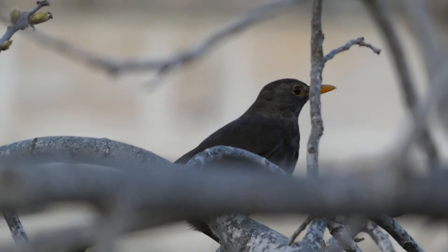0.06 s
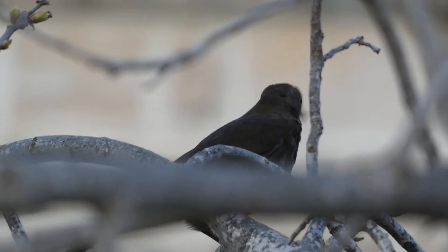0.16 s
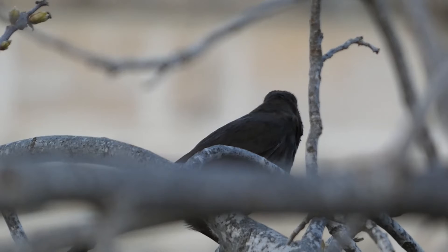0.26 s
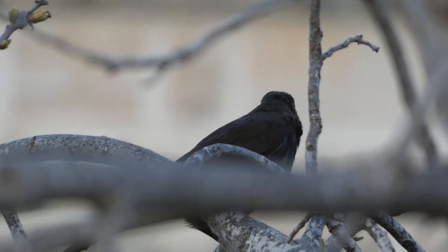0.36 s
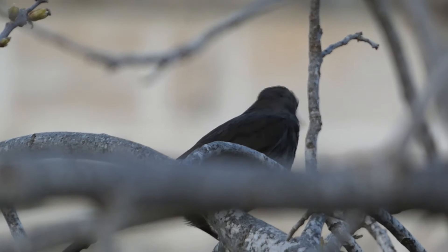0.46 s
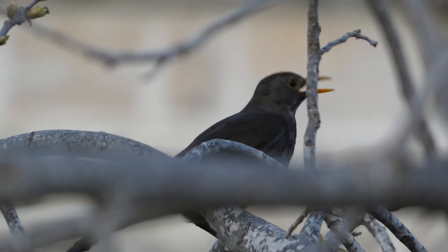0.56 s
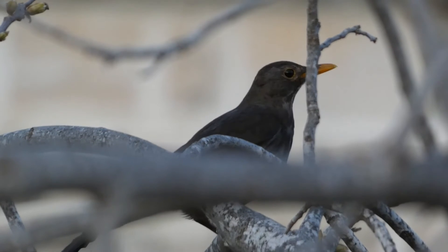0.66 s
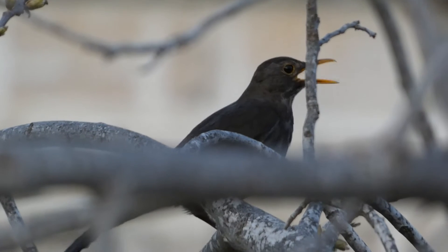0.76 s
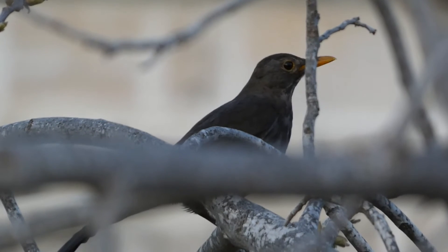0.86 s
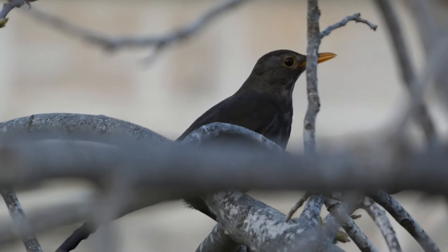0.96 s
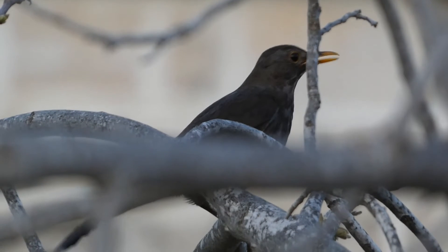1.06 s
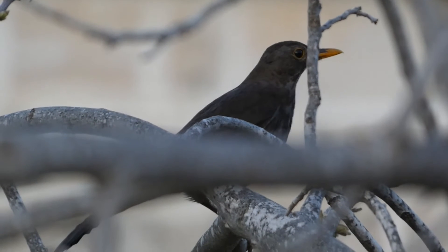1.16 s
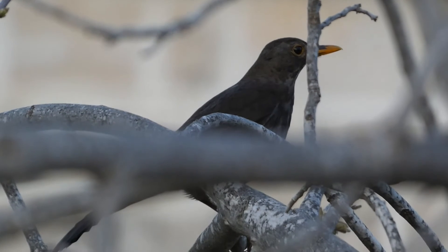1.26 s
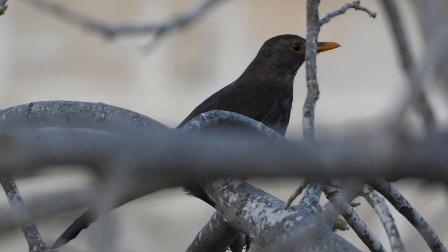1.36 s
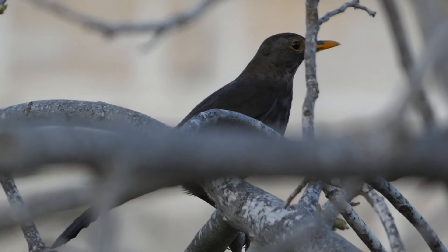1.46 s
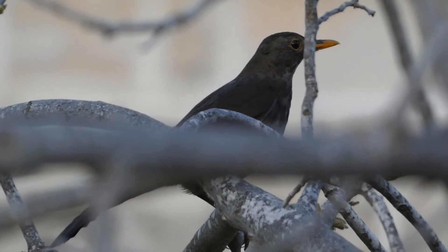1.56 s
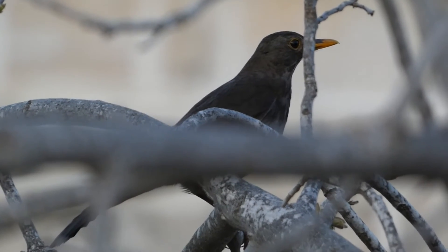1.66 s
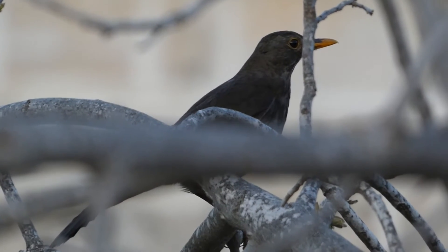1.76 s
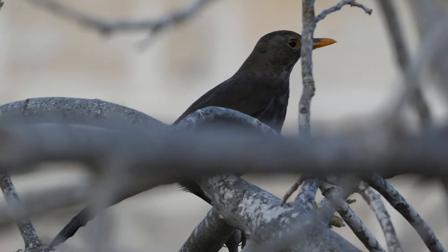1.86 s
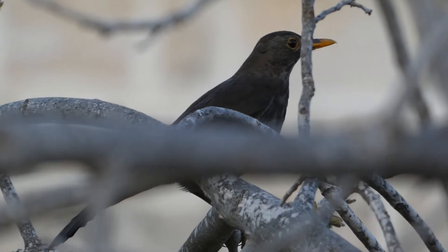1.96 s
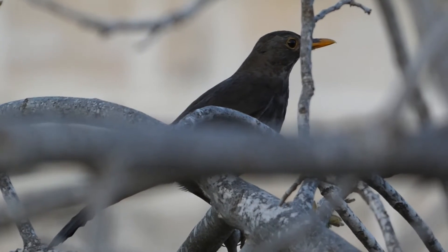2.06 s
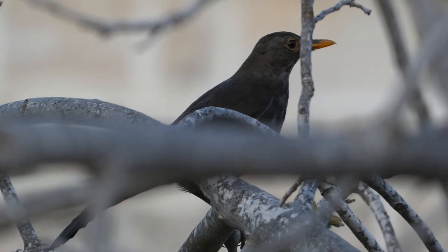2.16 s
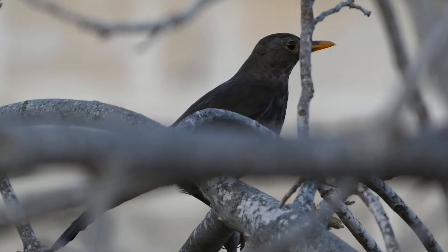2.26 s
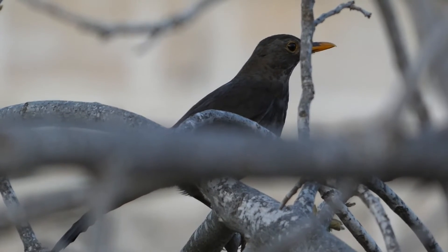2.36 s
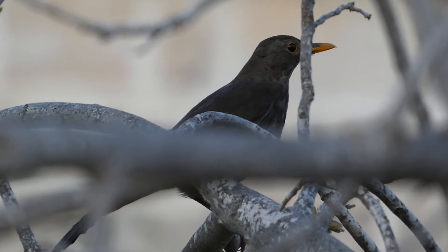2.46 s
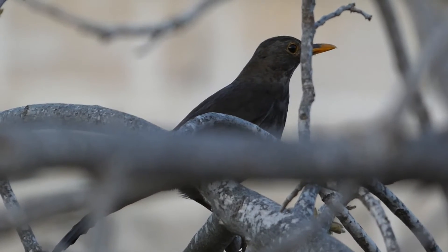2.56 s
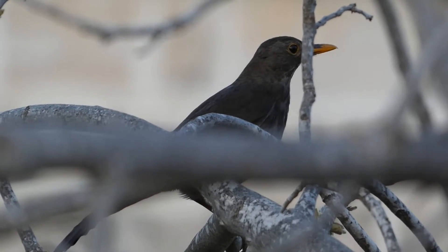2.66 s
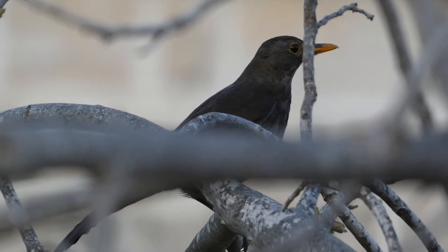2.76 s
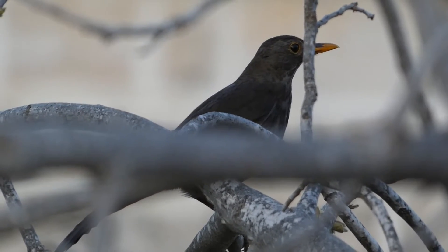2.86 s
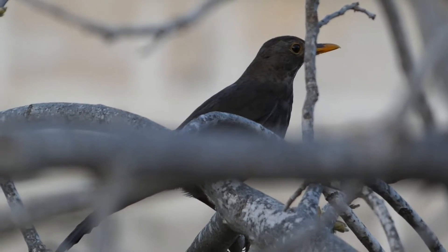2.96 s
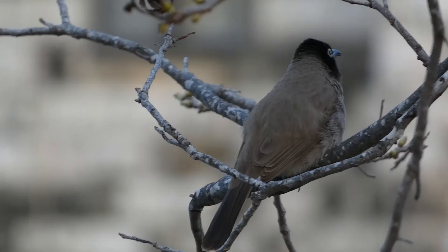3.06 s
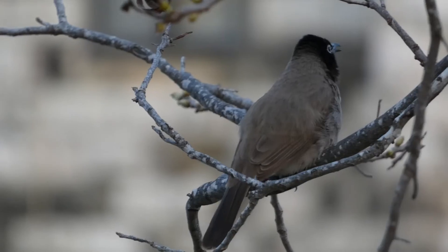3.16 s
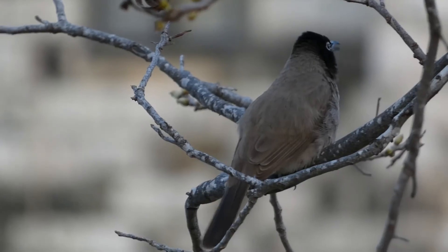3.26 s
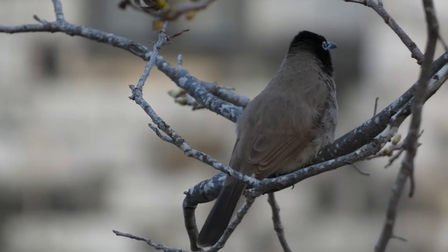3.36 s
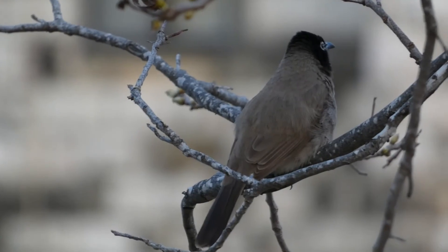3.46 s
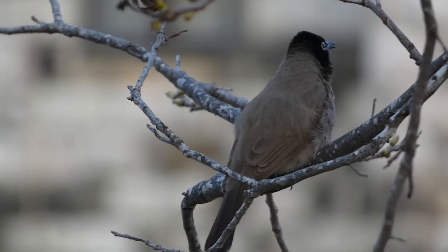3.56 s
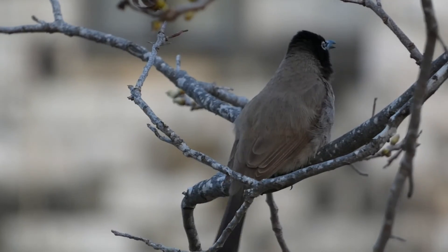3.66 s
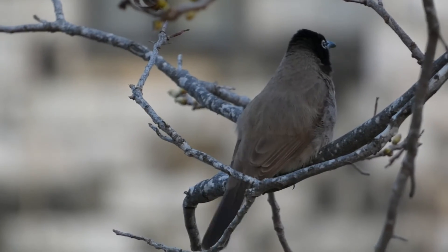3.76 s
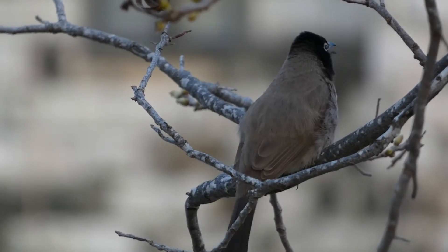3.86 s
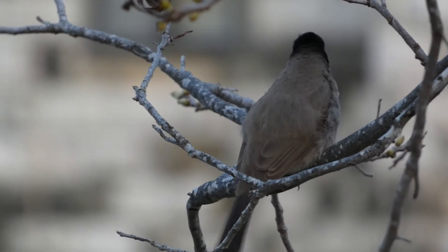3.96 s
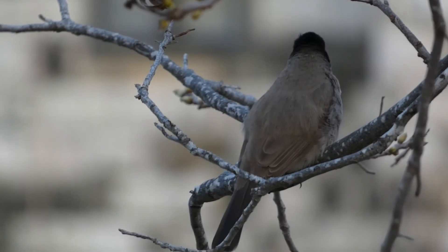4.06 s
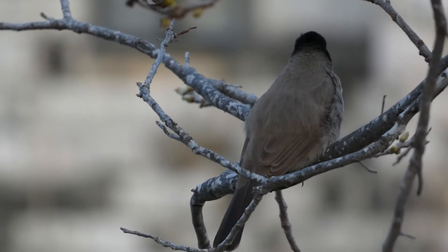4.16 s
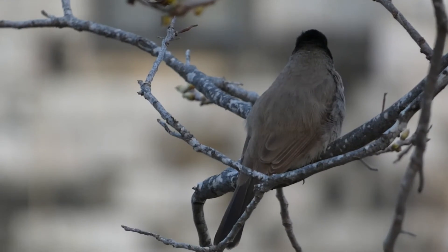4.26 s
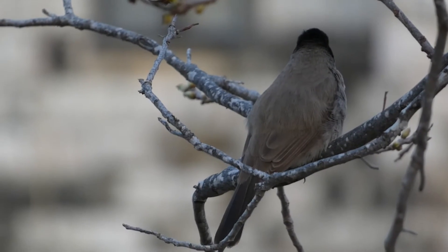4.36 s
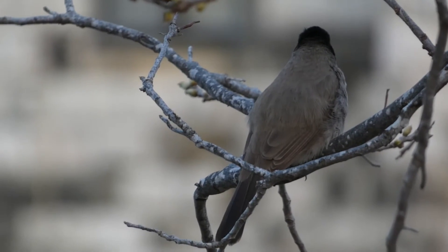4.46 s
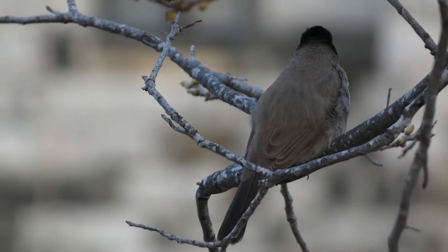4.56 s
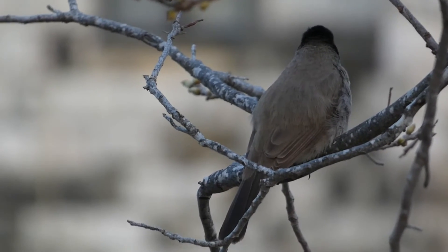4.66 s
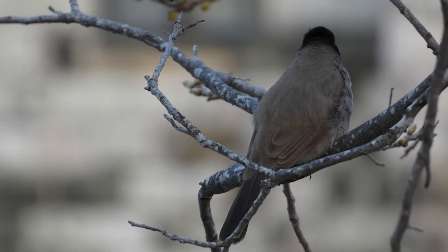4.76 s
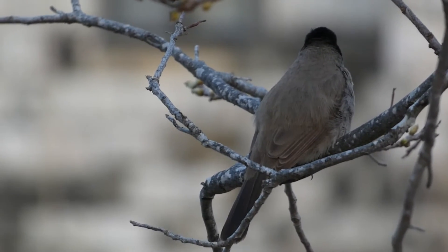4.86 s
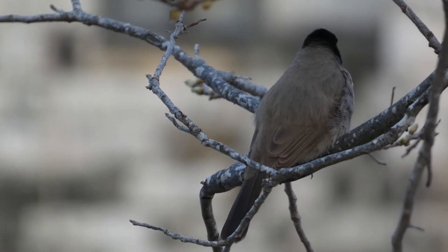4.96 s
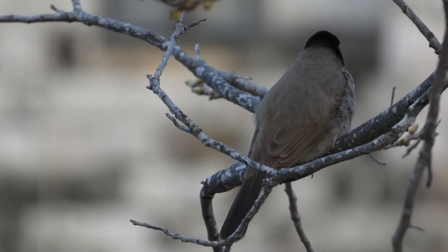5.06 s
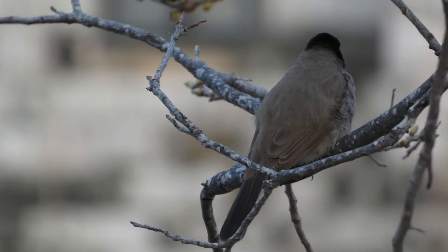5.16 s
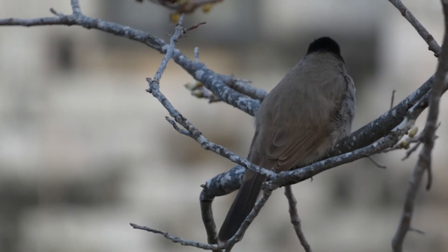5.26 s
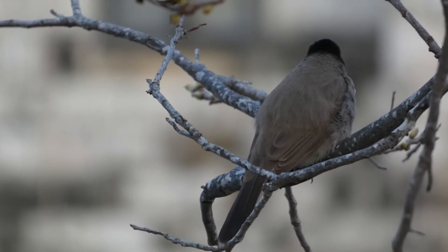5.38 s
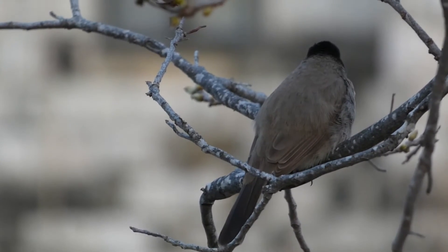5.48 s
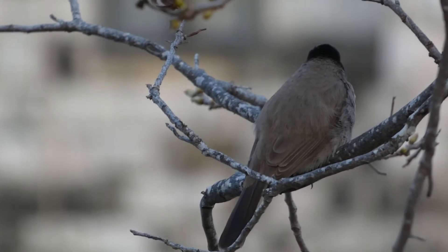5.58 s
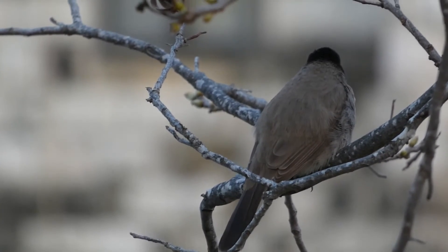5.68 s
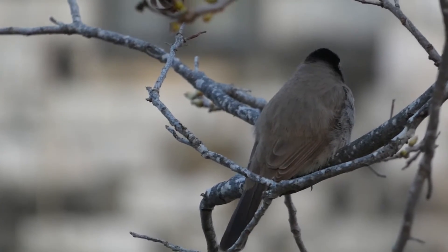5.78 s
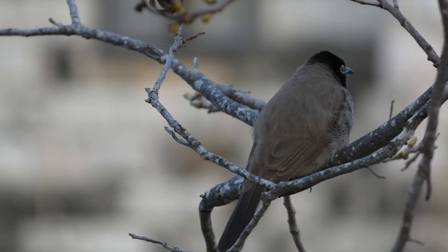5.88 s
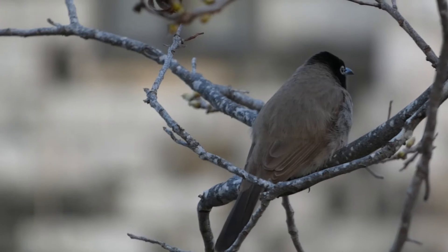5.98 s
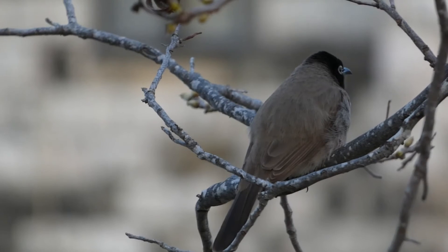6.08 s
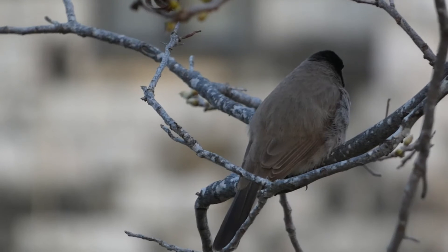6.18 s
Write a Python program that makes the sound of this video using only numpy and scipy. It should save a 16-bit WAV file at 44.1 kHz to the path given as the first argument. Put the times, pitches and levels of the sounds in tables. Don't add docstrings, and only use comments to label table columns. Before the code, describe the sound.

An outdoor stereo scene in quiet town yards, with soft low rumble, light hiss and faint, dense bird chatter, busiest at the start. A faint chirp at 0.57 s leads into three very short, bright metallic chinks from a blackbird at about 0.65, 0.84 and 1.1 s, the first softer, all with wall echoes. Small pips and distant whistles follow, then two clear hooked chirps from neighbours at 1.9 and 2.15 s. It thins until the scene changes at 3.13 s. A buzzy falling chirp and a nearer, rounded, flute-like warble come at 3.15-3.37 s with grainy clicks, a lower, softer warble at 3.6-3.8 s, and a brighter rising one at 3.9-4.05 s. Afterwards come smeared chirps near 4.15, 5.15 and 5.93 s, faint whistles, wavering low hums and a slight traffic swell around 4.5 s. Quick twittering pips from 5.5 s and a faint high trill from 5.66 s run to the end, about 6.2 s.

```python
import sys
import numpy as np
from scipy import signal
from scipy.fft import rfft, irfft, next_fast_len
from scipy.io import wavfile
from scipy.ndimage import uniform_filter1d

SR = 44100
rng = np.random.default_rng(int(sys.argv[2]) if len(sys.argv) > 2 else 0)


def waveform_to_disk(signal):
    frames = np.transpose(np.atleast_2d(signal))
    scaled = np.clip(frames, -1, 1) * 32767
    samples = np.round(scaled).astype(np.int16)
    wavfile.write(sys.argv[1], SR, samples)


def voltage_ratio(level):
    return 10 ** (np.asarray(level, float) / 20)


N = 274302
CUT_S = 3.13

# t60 in seconds, level in dB.
TAILS = [
    (.8, -23),
    (.9, -22),
    (.45, -15),
]


def along(table, hz):
    at, value = np.transpose(table)
    return np.interp(np.log(hz), np.log(at), value)


def wander(rate_hz):
    step = int(SR / rate_hz)
    x = np.repeat(rng.standard_normal(N // step + 1), step)
    x = uniform_filter1d(uniform_filter1d(x, step), step)[:N]
    return x / x.std()


def band(x, hz, width_hz):
    edges = np.clip([hz - width_hz / 2, hz + width_hz / 2], 20, SR / 2.2)
    y = signal.sosfilt(signal.butter(4, edges, "band", fs=SR, output="sos"), x)
    return y / y.std()


def lowpass(x, order, hz):
    return signal.sosfilt(signal.butter(order, hz, fs=SR, output="sos"), x)


def trace(note, fade_s):
    s, pitch_hz, db = np.transpose(sorted(note))
    at = np.arange(int((s[0] - fade_s) * SR), min(int((s[-1] + fade_s) * SR), N))
    t = at / SR
    fade = np.clip(np.minimum(t - t[0], t[-1] - t) / fade_s, 0, 1)
    size = np.sqrt(2) * np.interp(t, s, voltage_ratio(db)) * fade ** 2
    return at, size, uniform_filter1d(np.interp(t, s, pitch_hz), 60)


def voice(notes, fade_s, jitter, flutter_db):
    size, hz = np.zeros(N), np.zeros(N)
    for note in notes:
        at, size_here, hz_here = trace(note, fade_s)
        size[at], hz[at] = size_here, hz_here
    phase = 2 * np.pi * np.cumsum(hz * (1 + jitter * wander(300))) / SR
    return size * voltage_ratio(flutter_db * wander(200)), phase


def whistles(notes, bearings, fade_s, jitter, flutter_db):
    out = np.zeros((2, N))
    wobble, flutter = 1 + jitter * wander(300), voltage_ratio(flutter_db * wander(120))
    for note, (pan_db, lead_rad) in zip(notes, bearings):
        at, size, hz = trace(note, fade_s)
        phase = 2 * np.pi * np.cumsum(hz * wobble[at]) / SR
        for channel, way in enumerate((.5, -.5)):
            out[channel, at] += size * flutter[at] * voltage_ratio(way * pan_db) * np.sin(phase + way * lead_rad)
    return out


def glides(rows, ends_db):
    notes = []
    for s, length_s, first_hz, last_hz, db in rows:
        middle = (s + length_s / 2, (first_hz + last_hz) / 2, db)
        notes.append([(s, first_hz, db + ends_db), middle, (s + length_s, last_hz, db + ends_db)])
    return notes


def repeats(contour, starts_s):
    return [[(start + s, hz, db) for s, hz, db in contour] for start in starts_s]


def scatter(t60_s, rise_s, likeness):
    t = np.arange(int(t60_s * SR)) / SR
    mid, side = rng.standard_normal((2, len(t)))
    shape = np.exp(-np.log(1000) * t / t60_s) * (1 - np.exp(-t / rise_s))
    c = np.clip(likeness, -1, 1)
    pair = shape * (np.sqrt(1 + c) * mid + np.sqrt(1 - c) * side * np.array([[1], [-1]]))
    return pair / np.sqrt(np.sum(pair ** 2) / 2)


def yard(x, echoes, tail):
    t60_s, tail_db = tail
    response = voltage_ratio(tail_db) * scatter(t60_s, rise_s=0.024, likeness=0.79)[0]
    for delay_s, db in echoes:
        facade = scatter(delay_s * .35, rise_s=delay_s / 30, likeness=1)[0]
        start = int(delay_s * SR)
        response[start:start + len(facade)] += voltage_ratio(db) * facade
    response = lowpass(response, 2, 7000)
    returns = signal.fftconvolve(x, response[None], axes=1)[:, :N]
    return x + voltage_ratio(2.55 * wander(45)) * returns


def distance(x, direct_db, t60_s, likeness):
    response = scatter(t60_s, rise_s=0.0043, likeness=likeness)
    response[:, 0] += voltage_ratio(direct_db)
    return signal.fftconvolve(x, response, axes=1)[:, :N]


def town():
    # frequency in Hz, level in dB per Hz.
    colours = [
        [(15, -54), (25, -22.5), (99, -0.5), (205, -1.5), (261, -3.5), (342, -8), (436, -9), (619, -9),
         (1680, -17), (2880, -20.5), (12000, -28), (15800, -27.5)],
        [(15, -61), (25, -39), (80, -1.5), (179, -1), (254, 0), (413, -3.5), (556, -8.5), (1770, -17.5),
         (3580, -16.5), (6300, -28), (15800, -29)],
    ]
    levels_db = [-57, -53.5]
    # frequency in Hz, correlation from -1 to 1.
    likenesses = [
        [(40, 0.14), (130, 0.48), (3100, -0.56), (6800, 0.33), (15000, -0.38)],
        [(40, 0.29), (300, 0.66), (1400, 0.06), (3100, -0.4), (6800, .2), (15000, -0.2)],
    ]
    # frequency in Hz, left minus right in dB.
    lean_db = [(300, -1.5), (3000, -1), (12000, 1.5)]
    # time in seconds, gain in dB.
    traffic = [
        (3.13, -2),
        (4.2, -1.5),
        (4.55, 0.5),
        (6.22, -1.5),
    ]
    size = next_fast_len(N)
    hz = np.maximum(np.arange(size // 2 + 1) * SR / size, 1)
    lean = along(lean_db, hz) / 2
    after = np.clip((np.arange(N) / SR - CUT_S) / 0.012, 0, 1)
    out = 0
    for colour, db, likeness, share in zip(colours, levels_db, likenesses, (1 - after, after)):
        c = np.clip(along(likeness, hz), -1, 1)
        mid, side = rfft(rng.standard_normal((2, size))) * voltage_ratio(along(colour, hz))
        pair = mid + np.sqrt((1 - c) / (0.95 + c)) * side * np.array([[1], [-1]])
        noise = irfft(pair * voltage_ratio([lean, -lean]), size)[:, :N] / irfft(mid, size).std()
        out = out + share * voltage_ratio(db) * noise
    swell_db = np.interp(np.arange(N) / SR, *np.transpose(traffic), left=0) + 0.45 * wander(1.27)
    return out + lowpass(out, 2, 600) * (voltage_ratio(swell_db) - 1)


def drone():
    # start in seconds, length in seconds, first pitch in Hz, last pitch in Hz, level in dB.
    bursts = [(1.3, 0.044, 260, 265, -54.5), (4.5, 0.157, 234.1, 245, -53), (4.68, 0.086, 250, 261, -47.5),
              (4.97, 0.078, 259.7, 260, -52.5), (5.3, 0.293, 246.4, 258, -54), (5.74, 0.11, 258, 255, -54),
              (5.9, 0.17, 280, 250, -63.5), (5.17, 0.11, 240, 210, -61.5), (5.62, .06, 262, 264, -58),
              (4.28, .05, 330, 321, -58.5), (4.52, 0.066, 390, 353, -56), (4.6, .2, 350, 340, -61.5),
              (4.55, .15, 460, 455, -59), (4.89, .1, 445, 420, -62), (4.7, 0.11, 365, 375, -59.5),
              (4.45, 0.087, 530, 450, -65), (0.838, 0.048, 520, 520, -59.5), (1.5, 0.078, 770, 770, -64),
              (1.5, .17, 780, 770, -66), (3.97, 0.073, 800, 790, -60.5)]
    bearings = [(0.0031, 0)] * len(bursts)
    tones = whistles(glides(bursts, ends_db=-2.0), bearings, fade_s=.03, jitter=0.033, flutter_db=2.5)
    return tones * voltage_ratio(2 * wander(25))


def chatter(count=900):
    # time in seconds, level in dB.
    course = [
        (0.0, -55.5),
        (0.95, -59.5),
        (2.87, -61.5),
        (4.17, -61.5),
        (5.2, -61),
        (6.22, -65),
    ]
    out = np.zeros(N + SR)
    for when, pitch, glide, length, size in rng.random((count, 5)):
        t = np.arange(int((0.01 + 0.044 * length) * SR)) / SR
        hz = 2800 * 2.1 ** pitch ** 1.5 * (1 + 9 * (glide - .6) * t)
        start = int(when * N)
        chirp = np.hanning(len(t)) * np.sin(2 * np.pi * np.cumsum(hz) / SR)
        out[start:start + len(t)] += voltage_ratio(-9 * size) * chirp
    s, db = np.transpose(course)
    crowd = out[:N] / out[:N].std() * voltage_ratio(np.interp(np.arange(N) / SR, s, db) - 2)
    return distance(crowd[None], direct_db=-7, t60_s=0.58, likeness=-0.31)


def trill():
    # pitch in Hz, level in dB, offset from the beat in seconds.
    blips = [
        (6000, -56.5, 0),
        (5950, -66.5, 0.0496),
    ]
    beats_s = np.arange(5.662, 6.2, .1)
    notes = []
    for hz, db, lag_s in blips:
        for s in beats_s + lag_s:
            notes.append([(s - .004, 1.01 * hz, db), (s, hz, db), (s + 0.0061, .975 * hz, db - 2)])
    return whistles(notes, [(2, -1.7)] * len(notes), fade_s=.004, jitter=.004, flutter_db=1)


def aside():
    # start in seconds, length in seconds, first pitch in Hz, last pitch in Hz, level in dB.
    falls = [
        (1.9, .12, 2580, 1556, -63),
        (4.5, .25, 3000, 1627, -65),
        (5.09, .21, 2700, 1260, -69),
        (4.3, .14, 2650, 2460, -62),
    ]
    # seconds after start, pitch in Hz, level in dB.
    arch = [
        (0, 1459, -69),
        (.03, 1618, -75),
        (0.061, 1520, -67),
        (.085, 1400, -67),
    ]
    arch_starts_s = [.805, 1.13, 1.455, 1.78, 2.13]
    # seconds after start, pitch in Hz, level in dB.
    swoop = [
        (0, 4450, -48),
        (.04, 3220, -72),
        (.12, 3380, -64),
        (.18, 4610, -53.5),
    ]
    swoop_starts_s = [.92, 1.36]
    notes = glides(falls, ends_db=-4) + repeats(arch, arch_starts_s) + repeats(swoop, swoop_starts_s)
    return whistles(notes, [(0, 2.82)] * len(notes), fade_s=.01, jitter=0.0071, flutter_db=4.5)


def far_birds():
    # start in seconds, length in seconds, first pitch in Hz, last pitch in Hz, level in dB.
    rows = [(.23, 0.049, 9250, 8970, -72), (.37, 0.081, 4510, 4200, -65), (.553, 0.013, 5300, 5120, -67),
            (.583, .012, 5600, 3900, -64), (.775, .02, 5240, 5650, -60), (1.655, .02, 5430, 6210, -61),
            (1.675, 0.014, 6200, 5700, -59.5), (1.75, .022, 4700, 5760, -58.5),
            (1.775, 0.033, 5730, 5870, -66), (3.52, 0.12, 6190, 6150, -73.5), (3.78, .16, 5000, 6240, -77),
            (3.79, 0.052, 4072, 4080, -59), (3.875, 0.18, 6180, 6153, -66.5), (4.18, .1, 6158, 6120, -63.5),
            (4.285, .02, 6090, 5300, -59.5), (4.39, 0.089, 4942, 4935, -62.5),
            (4.46, 0.25, 3223, 3110, -60), (4.72, 0.13, 3560, 3500, -66), (4.82, 0.16, 8020, 8050, -69.5),
            (5.06, 0.16, 7860, 7885, -66.5), (5.45, 0.11, 5660, 5560, -72),
            (4.88, 0.073, 5120, 4980, -67.5)]
    bearings = [(2, -1.58)] * len(rows)
    far = whistles(glides(rows, ends_db=-2.5), bearings, fade_s=0.0055, jitter=.003, flutter_db=3)
    far = far + trill() + aside()
    return voltage_ratio(3.0) * distance(far, direct_db=2.5, t60_s=0.66, likeness=0.82)


def hidden_birds():
    # start in seconds, length in seconds, first pitch in Hz, last pitch in Hz, level in dB.
    rows = [(3.85, 0.041, 3440, 4197, -60), (3.893, 0.026, 4250, 3460, -57),
            (4.085, .06, 3980, 3965, -56.5), (4.55, 0.11, 5125, 5740, -67.5),
            (4.68, 0.057, 5630, 4750, -62), (4.89, 0.037, 3940, 3600, -63), (5.08, .11, 3500, 4100, -66),
            (4.5, 0.055, 3820, 3890, -68), (4.62, .06, 3320, 3010, -63), (4.52, .18, 2800, 1950, -73.5)]
    # top in seconds, top pitch in Hz, level in dB.
    spikes = [
        (4.153, 5290, -53),
        (5.146, 5280, -58),
        (5.934, 5300, -53),
    ]
    # seconds from top, share of top pitch, level in dB.
    spike = [
        (-.006, .74, 2),
        (0, 0.97, -7.5),
        (.01, .77, 1.5),
        (.036, .58, -3),
    ]
    notes = glides(rows, ends_db=-2.5)
    for top_s, hz, db in spikes:
        notes.append([(top_s + s, hz * share, db + more_db) for s, share, more_db in spike])
    hidden = whistles(notes, [(0, -.5)] * len(notes), fade_s=.005, jitter=.01, flutter_db=3.5)
    echoes = [(.019, 0.2), (.034, 0.35), (.057, 0.3)]
    hidden = hidden + sum(share * np.roll(hidden, int(lag_s * SR), axis=1) for lag_s, share in echoes)
    return voltage_ratio(1.5) * distance(hidden, direct_db=2.5, t60_s=.45, likeness=.9)


def hooks(rows, run_s, run_db, sag_db, fall_s, fall_hz):
    dip_s, dip_db_per_khz = .01, 16
    notes = []
    for s, run_hz, dip_hz, spike_hz, db in rows:
        notes.append([
            (s - run_s, .92 * run_hz, db - 19),
            (s - 0.764 * run_s, run_hz, db + run_db - 5.5),
            (s - 0.485 * run_s, .99 * run_hz, db + run_db),
            (s - 1.9 * dip_s, .94 * run_hz, db + sag_db),
            (s - dip_s, dip_hz, db - dip_db_per_khz * (run_hz - dip_hz) / 1e3),
            (s, spike_hz, db),
            (s + 0.37 * fall_s, fall_hz + .55 * (spike_hz - fall_hz), db - 5.5),
            (s + fall_s, fall_hz, db - 18.0)])
    return notes


def buzz(count=9):
    # time in seconds, fundamental in Hz.
    fundamental = [
        (3.145, 1960),
        (3.165, 1527),
        (3.183, 1510),
        (3.198, 1010),
    ]
    # multiple, start in seconds, end in seconds, level in dB.
    overtones = [(2, 3.145, 3.178, -52), (3, 3.15, 3.175, -53.5), (3, 3.172, 3.194, -39.5),
                 (4, 3.157, 3.18, -50.5), (5, 3.15, 3.175, -50.5), (5, 3.188, 3.198, -39),
                 (6, 3.18, 3.196, -38)]
    share = np.linspace(0, 1, count)
    notes = []
    for multiple, start_s, end_s, db in overtones:
        t = start_s + share * (end_s - start_s)
        hz = np.round(multiple) * np.interp(t, *np.transpose(fundamental))
        notes.append(list(zip(t, hz, db - 30 * (share - .65) ** 2)))
    return notes


def neighbours():
    # spike in seconds, run pitch in Hz, dip pitch in Hz, spike pitch in Hz, level in dB.
    loud_hooks = [
        (1.908, 3538, 3015, 3690, -37),
        (2.146, 3800, 2500, 4130, -36),
    ]
    faint_hooks = [
        (.568, 3640, 2520, 4120, -47),
        (5.465, 3650, 3020, 4100, -55.5),
    ]
    # left minus right in dB, left phase lead in rad.
    hook_bearings = [
        (-3, 0.84),
        (-3, 0.82),
        (-10, -1.5),
        (-9, -.5),
    ]
    # start in seconds, length in seconds, first pitch in Hz, last pitch in Hz, level in dB.
    rows = [(1.912, .026, 6850, 4480, -60.5), (2.705, 0.04, 2780, 3350, -55),
            (2.745, 0.016, 3260, 2920, -56), (2.722, 0.041, 3900, 4000, -57.5),
            (2.89, 0.033, 3530, 3360, -63), (3.052, 0.11, 5200, 5750, -62), (3.205, .011, 4300, 5250, -53),
            (3.218, .006, 5130, 4200, -51), (3.225, 0.0083, 4150, 3860, -45),
            (3.24, 0.013, 6090, 6440, -44.5), (3.251, 0.014, 5780, 5750, -41.5),
            (3.925, 0.022, 2800, 3250, -42.5)]
    # left minus right in dB, left phase lead in rad.
    glide_bearings = [(0, -.2), (-4, -1.8), (-6, -2), (-11, -2), (-9, 2), (0.5, .8), (-1.5, -1), (1, -.5),
                      (0, 0), (-0.5, 1), (0, 1), (1, -0.94)]
    # start in seconds, length in seconds, first pitch in Hz, last pitch in Hz, level in dB.
    pips = [(5.5, .012, 3950, 4100, -60), (5.518, .012, 3750, 3600, -53), (5.545, .015, 3700, 3800, -55),
            (5.6, .01, 3500, 3300, -61), (5.618, .01, 3050, 2950, -57), (5.65, .008, 3800, 3600, -61),
            (5.678, .012, 3500, 3700, -58), (5.715, .012, 3050, 2950, -58), (5.722, .012, 3600, 3900, -61),
            (5.745, .01, 3600, 3350, -59), (5.765, .012, 3700, 3900, -60), (5.8, .012, 3950, 3500, -59),
            (5.815, .012, 3050, 2950, -57), (5.19, .012, 3000, 3300, -59), (5.215, .012, 3400, 3050, -59),
            (5.968, .012, 4400, 4100, -57), (5.985, .014, 3000, 3300, -57), (6.005, .014, 3350, 3000, -57),
            (6.0, .012, 4100, 3800, -59), (6.045, .02, 3050, 3200, -61), (4.188, .012, 3800, 3600, -54),
            (4.195, .03, 3150, 3050, -55), (3.64, .11, 2570, 2500, -57), (1.27, .02, 5500, 5700, -56),
            (1.37, .06, 5150, 5050, -59), (1.43, .02, 3950, 3500, -59), (1.455, .05, 6400, 6400, -63),
            (1.54, .025, 3400, 3950, -59), (1.575, .11, 4500, 4400, -63), (1.72, .02, 3900, 3900, -60),
            (1.745, .015, 4250, 4400, -60), (3.24, .02, 3100, 3200, -50), (3.285, .012, 3600, 3100, -50),
            (3.333, .01, 3800, 4500, -46), (3.35, .012, 3300, 2900, -46), (3.243, .012, 9100, 9700, -58),
            (3.252, .008, 5300, 5000, -47), (2.133, .008, 4700, 5300, -60), (2.155, .02, 6200, 4800, -65)]
    notes = hooks(loud_hooks, run_s=0.055, run_db=-5, sag_db=-2.0, fall_s=.025, fall_hz=2500)
    notes += hooks(faint_hooks, run_s=0.07, run_db=1, sag_db=-4, fall_s=0.0148, fall_hz=2800)
    notes += glides(rows, ends_db=-1.5)
    buzzes = buzz()
    notes += buzzes + glides(pips, ends_db=-3)
    bearings = hook_bearings + glide_bearings + [(1.5, 0.85)] * len(buzzes) + [(0, -.5)] * len(pips)
    return yard(whistles(notes, bearings, fade_s=.004, jitter=0.0017, flutter_db=1.5), [], TAILS[2])


def rasps():
    # centre in seconds, length in seconds, centre in Hz, width in Hz, level in dB.
    puffs = [(0.647, 0.009, 6500, 3000, -54), (0.838, 0.011, 5500, 5000, -39.5),
             (0.838, .012, 11000, 6000, -56), (1.094, 0.012, 5030, 4960, -42),
             (1.096, 0.014, 11000, 6000, -57), (3.171, 0.023, 8500, 3000, -55),
             (3.19, 0.011, 6400, 5020, -40.5), (3.253, 0.015, 6470, 4000, -44.5),
             (3.27, 0.03, 3600, 1500, -49), (3.3, .025, 3500, 1500, -49), (3.337, 0.009, 4200, 2400, -40),
             (3.344, 0.014, 3600, 3000, -51), (3.67, 0.1, 10900, 1099, -68.5),
             (3.776, 0.056, 10800, 2000, -67), (4.02, 0.044, 9000, 1490, -63),
             (4.021, 0.038, 5508, 1206, -57), (4.155, 0.088, 5297, 1200, -57), (3.6, .04, 2150, 500, -54),
             (5.13, 0.038, 5190, 700, -62), (5.92, .05, 5200, 800, -60), (3.355, .012, 4500, 4000, -53),
             (.989, .001, 11000, 8000, -58)]
    out, air = np.zeros(N), rng.standard_normal(N) * voltage_ratio(1.2 * wander(400))
    for s, length_s, hz, width_hz, db in puffs:
        n = int(2.14 * length_s * SR)
        start = int(s * SR) - n // 2
        puff = band(air[start - 500:start + n], hz, width_hz)[500:]
        out[start:start + n] += voltage_ratio(db) * np.hanning(n) * puff
    return out


def warbles():
    # time in seconds, pitch in Hz, level in dB.
    first_notes = [
        [(3.215, 2354, -46), (3.235, 1767, -32.5), (3.246, 1800, -32), (3.26, 2008, -28), (3.275, 2017, -23),
         (3.29, 2059, -25), (3.302, 1985, -24)],
        [(3.31, 2285, -31.5), (3.325, 2290, -27.5), (3.337, 2139, -22.5), (3.347, 1908, -20),
         (3.357, 2016, -18), (3.366, 2151, -39)],
        [(3.597, 1555, -42), (3.61, 1385, -37.5), (3.634, 1814, -34.5), (3.645, 1800, -33.5),
         (3.655, 1675, -32), (3.722, 1660, -36)],
        [(3.73, 1667, -30.5), (3.75, 1574, -26.5), (3.761, 1876, -24), (3.785, 1728, -27), (3.797, 1701, -23),
         (3.805, 1804, -33.5)],
        [(3.908, 2624, -30), (3.912, 1892, -34), (3.918, 1687, -33.5), (3.937, 2236, -31), (3.944, 2280, -31)],
        [(3.951, 2524, -18.5), (3.99, 2447, -21), (3.997, 2550, -28.5), (4.025, 2602, -23.5),
         (4.036, 2656, -16.5), (4.045, 2504, -40)],
    ]
    second_notes = [
        [(3.232, 2030, -46.5), (3.248, 2100, -37), (3.26, 1750, -47), (3.285, 1778, -41), (3.3, 1864, -35.5),
         (3.33, 2036, -34), (3.342, 1882, -28.5), (3.362, 2309, -30)],
        [(3.757, 1577, -41.5), (3.776, 1560, -39), (3.795, 1530, -47)],
        [(3.994, 2413, -18.5), (4.01, 2800, -23.5), (4.02, 2801, -22), (4.04, 2770, -25)],
    ]
    multiples = [1, 1.5, 2]
    partials_db = [0, -36, -42]
    size, phase = voice(first_notes, fade_s=.003, jitter=0.0021, flutter_db=1.0)
    second, second_phase = voice(second_notes, fade_s=0.0024, jitter=0.0039, flutter_db=3)
    flute = 0
    for k, db in zip(multiples, partials_db):
        flute = flute + voltage_ratio(db + (k > 1) * 3.1 * wander(90)) * np.sin(k * phase)
    breath = voltage_ratio(-34) * band(rng.standard_normal(N), 630, 700) * np.sin(phase)
    pair = np.sin(second_phase) + voltage_ratio(-5.5) * np.sin(2 * phase - second_phase)
    return size * (flute + breath) + second * pair


def chink_notes(count=24):
    # start in seconds, length in seconds, first level in dB, last level in dB.
    uppers = [
        (.647, 0.042, -36.5, -38.5),
        (.8385, 0.041, -27, -28.5),
        (1.0937, 0.039, -28, -32),
    ]
    # length in seconds, entry in Hz, rest in Hz, first level in dB, last level in dB.
    lowers = [
        (.024, 4850, 4760, -37, -26.5),
        (.035, 5600, 4900, -23.5, -21.5),
        (.032, 5550, 4720, -22, -21),
    ]
    rise_from_hz, rise_to_hz, rise_s, creep_hz_per_s = 3900, 6570, .0075, 6000
    join_s, sag_s = .006, .011
    lows, highs, share = [], [], np.linspace(0, 1, count)
    for (s, length_s, first_db, last_db), lower in zip(uppers, lowers):
        t = share * length_s
        risen = 1 - np.exp(-(t / rise_s) ** 1.8)
        hz = rise_from_hz + (rise_to_hz - rise_from_hz) * risen + creep_hz_per_s * t
        db = first_db + (last_db - first_db) * share - 10 * np.exp(-t / 0.0011)
        highs.append(list(zip(s + t, hz, db)))
        length_s, entry_hz, rest_hz, first_db, last_db = lower
        t = share * length_s
        hz = rest_hz + (entry_hz - rest_hz) * np.exp(-t / sag_s)
        lows.append(list(zip(s + join_s + t, hz, first_db + (last_db - first_db) * share)))
    return lows, highs


def chinks():
    mixing = [
        (2, 0),
        (1, 1),
        (0, 2),
        (3, 0),
        (-1, 2),
    ]
    mixing_db = [-22, -11, -27, -34, -25]
    lows, highs = chink_notes()
    low, low_phase = voice(lows, fade_s=.003, jitter=.003, flutter_db=1.8)
    high, high_phase = voice(highs, fade_s=.003, jitter=0.0048, flutter_db=0.0)
    mixed = 0
    for (a, b), db in zip(mixing, mixing_db):
        mixed = mixed + voltage_ratio(db + 3.6 * wander(148.7)) * np.sin(a * low_phase + b * high_phase)
    mixed = lowpass(mixed, 6, 15000)
    upper = np.sin(high_phase) + voltage_ratio(-26) * np.sin(2 * high_phase)
    return low * np.sin(low_phase) + high * upper + np.sqrt(low * high) * mixed


def near_birds():
    # delay in seconds, level in dB.
    echoes = [
        [(.007, -12), (.014, -17), (.036, -20), (.058, -19), (.1, -25), (.16, -28)],
        [(.011, -16), (.022, -20), (.045, -21.5), (.085, -32.5)],
    ]
    before = np.arange(N) < CUT_S * SR
    near = (chinks() + warbles() + rasps())[None]
    return yard(near * before, echoes[0], TAILS[0]) + yard(near * ~before, echoes[1], TAILS[1])


def scene():
    background = town() + drone() + chatter()
    return background + far_birds() + hidden_birds() + neighbours() + near_birds()


def roll_off(x):
    return signal.sosfilt(signal.butter(12, 15910, fs=SR, output="sos"), x)


def record(dry):
    ceiling = 0.29
    reach = np.abs(signal.hilbert(dry.mean(0), next_fast_len(N))[:N]) / ceiling
    limited = dry / (1 + reach ** 4) ** 0.29
    edge = signal.ellip(8, .1, 60, 15780, fs=SR, output="sos")
    return roll_off(signal.sosfilt(edge, limited))


dry = scene()
out = record(dry)
waveform_to_disk(out)
```